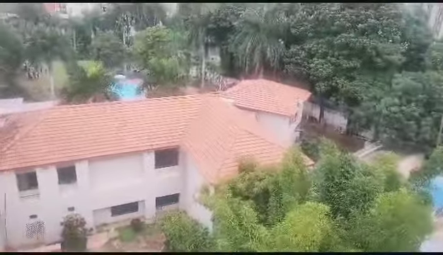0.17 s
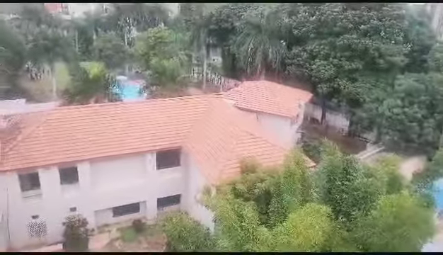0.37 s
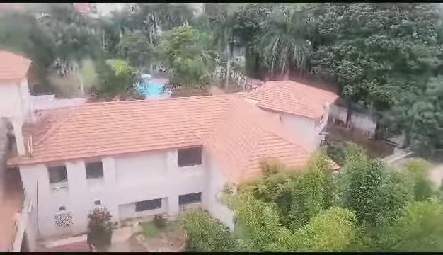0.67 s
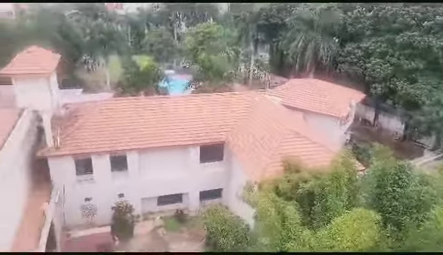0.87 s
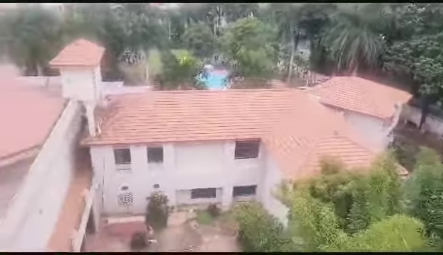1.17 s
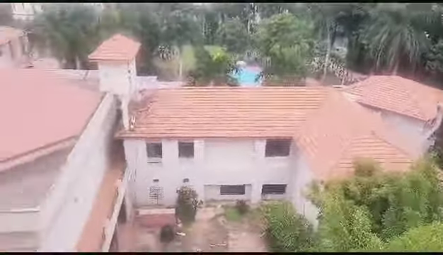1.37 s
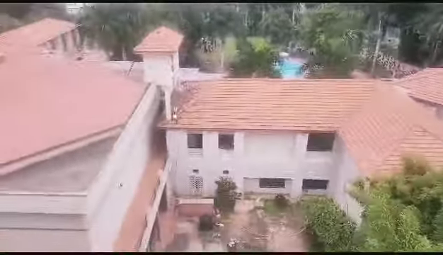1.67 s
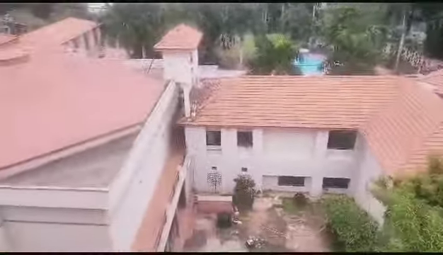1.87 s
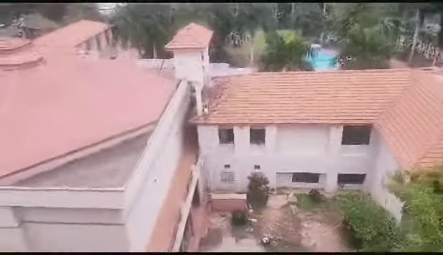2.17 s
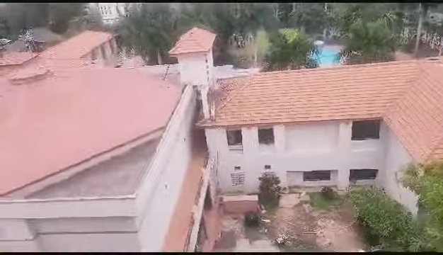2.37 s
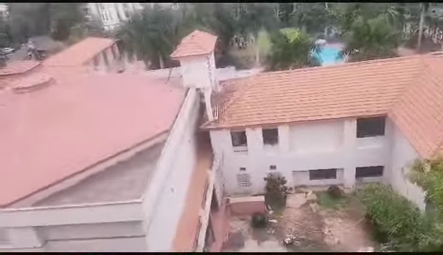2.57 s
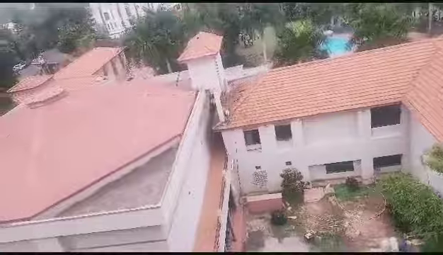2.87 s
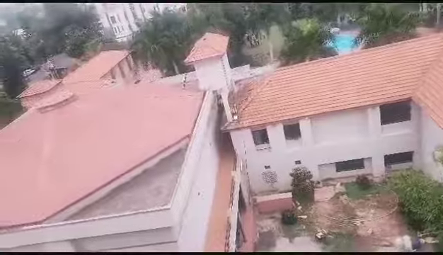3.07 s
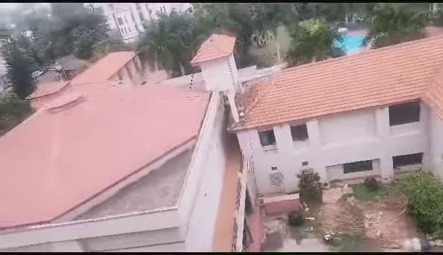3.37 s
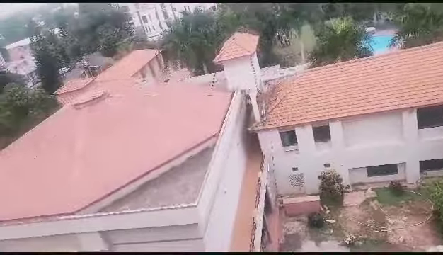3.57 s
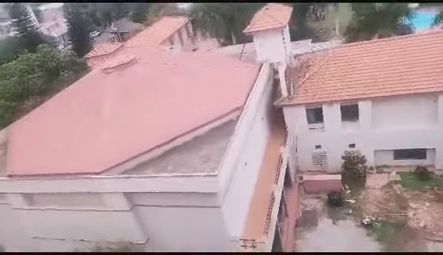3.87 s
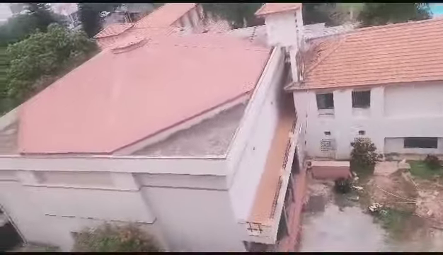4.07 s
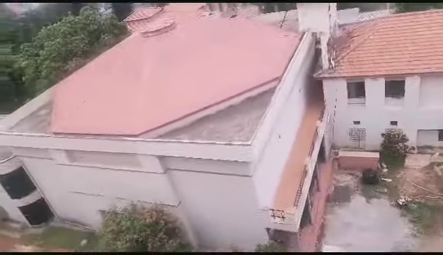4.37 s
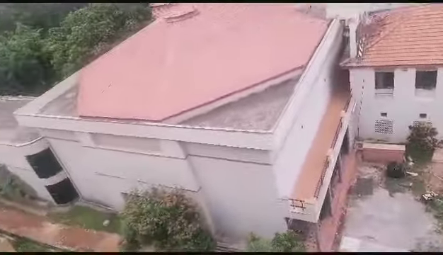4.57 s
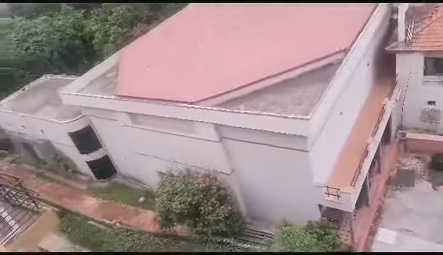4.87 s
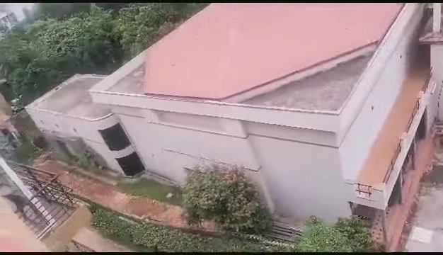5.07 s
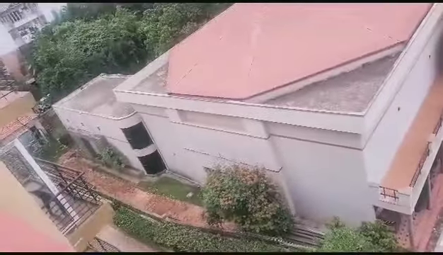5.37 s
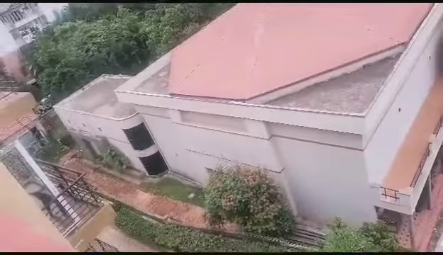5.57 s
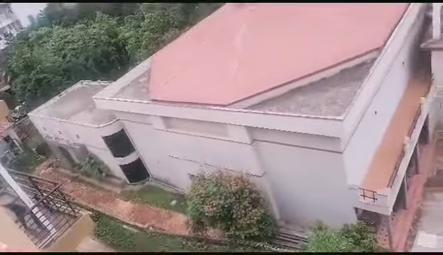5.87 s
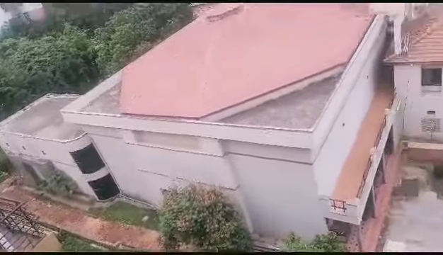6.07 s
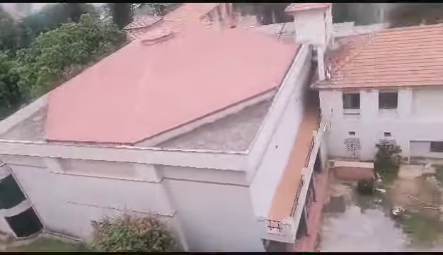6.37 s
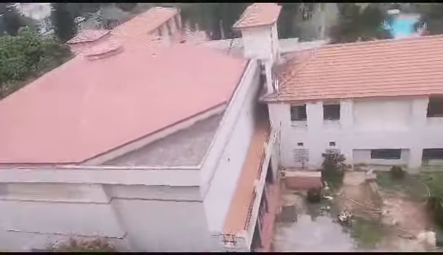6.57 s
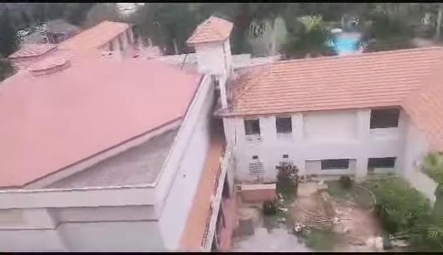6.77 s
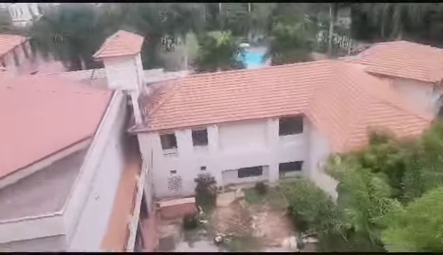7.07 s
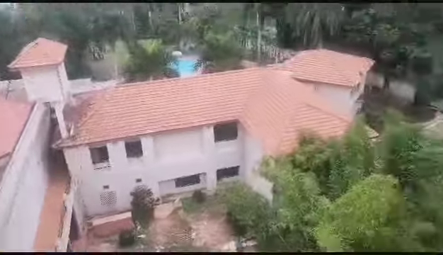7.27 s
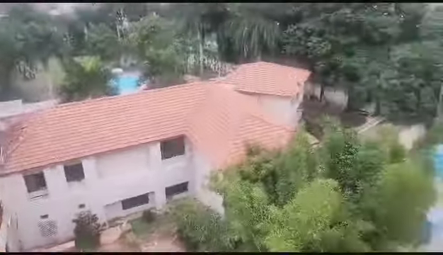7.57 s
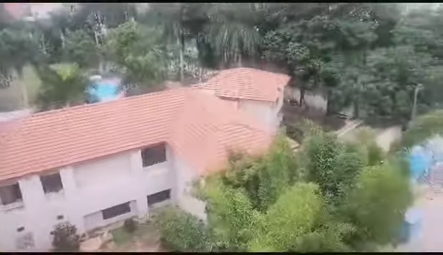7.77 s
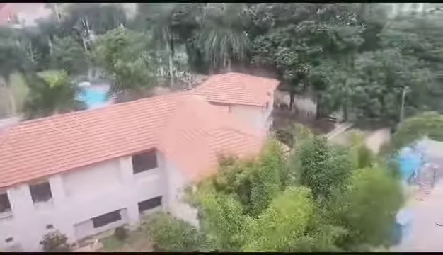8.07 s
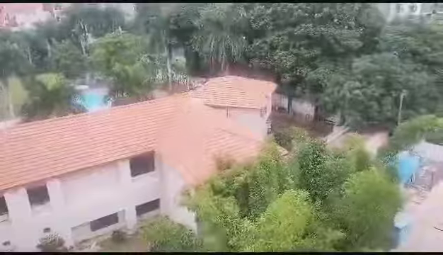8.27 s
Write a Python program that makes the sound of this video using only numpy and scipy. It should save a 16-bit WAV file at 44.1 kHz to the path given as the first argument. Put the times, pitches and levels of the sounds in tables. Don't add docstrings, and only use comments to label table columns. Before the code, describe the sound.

From high above tiled roofs, dull machine hammering at seven blows a second echoes between walls, then ceases as birds cry faintly and the engine fades.

```python
import sys
import numpy as np
from scipy import signal
from scipy.io import wavfile
from scipy.ndimage import uniform_filter1d

SR = 44100
rng = np.random.default_rng(int(sys.argv[2]) if len(sys.argv) > 2 else 0)


def int16_out(signal):
    q = np.round(np.clip(np.atleast_2d(signal).T, -1, 1) * 32767)
    wavfile.write(sys.argv[1], SR, q.astype(np.int16))


def undo_db(level):
    steps = np.asarray(level, float) / 20
    return 10 ** steps


N = 371322


def evened(x):
    return x / np.sqrt(np.mean(x ** 2) + 1e-20)


def read(points, hz):
    f, value = np.transpose(points)
    return np.interp(np.log(hz + 1), np.log(f + 1), value)


def curves(rows, t):
    s, *columns = np.transpose(rows)
    return [np.interp(t, s, c) for c in columns]


def swells(rows, t):
    return sum(db * np.exp(-((t - s) / half) ** 2) for s, half, db in rows)


def drift(per_s):
    count = int(N / SR * per_s) + 2
    knots = rng.standard_normal(count)
    return evened(np.interp(np.linspace(0, count - 1, N), np.arange(count), knots))


def add(mix, s, sound):
    at = round(s * SR)
    sound = sound[..., max(-at, 0):]
    part = mix[..., max(at, 0):][..., :sound.shape[-1]]
    part += sound[..., :part.shape[-1]]


# t/s, lag of left port/samples
PORT_LAG = [(0, -12), (.75, -10), (1.25, 1), (1.75, 6), (3.25, 8), (4.25, 13), (5.75, 16), (6.75, 12),
            (7.25, 1), (7.75, -10), (8.42, -8)]


def ports(x, pan_db):
    n = np.arange(N)
    lag, = curves(PORT_LAG, n / SR)
    left = np.interp(n - lag / 2, n, x) * undo_db(pan_db / 2)
    right = np.interp(n + lag / 2, n, x) * undo_db(-pan_db / 2)
    return np.array([left, right])


# t/s, blow number, strength/dB
STROKE = [(0.0171, 0, -24), (0.1763, 1, -21.5), (0.325, 2, -21), (0.7456, 5, -14.5), (1.327, 9, -15),
          (1.4786, 10, -15.5), (1.7801, 12, -15), (2.0736, 14, -14.5), (2.795, 19, -15.5),
          (3.0803, 21, -12.5), (3.5084, 24, -13.5), (4.2501, 29, -15.5), (4.7072, 32, -14.5),
          (4.8555, 33, -17.5), (5.4434, 37, -17.5), (6.0481, 41, -17), (6.202, 42, -17), (6.6818, 45, -18)]


def blows():
    s, number, db = np.transpose(STROKE)
    each = np.arange(round(number[-1]) + 1)
    return np.interp(each, number.round(), s), np.interp(each, number.round(), db)


def thud(t, hz):
    return np.exp(-(t * hz / 0.64) ** 2) * np.cos(2 * np.pi * hz * t + 1.14)


THUD_HZ, CASING_HZ, PLATE_HZ = 169, 284.5, 440
BRISK_GAP_S, SAG_PER_S = 0.1484, 14
ECHO_DB, ECHO_FOLLOW, SOFT_ECHO_DB_PER_S = -15.5, 0.1, -350
CASING_DB, CASING_DB_PER_LAG = -7, 0.3153
PLATE_DB, PLATE_DB_PER_LAG = -11.5, 0.47
# delay/s, signed share
THUD_PATHS = [(-0.0169, -0.21), (-0.0062, -0.23), (-0.0003, -1.0), (0.0119, -0.76), (0.0169, -0.41),
              (0.0276, -0.3), (0.0326, 0.39), (0.0464, 0.4), (0.0666, 0.27), (0.0729, -0.23),
              (0.0836, -0.31), (0.1035, -0.19)]


def breaker():
    out, t = np.zeros(N), np.arange(-600, 600) / SR
    times, strengths = blows()
    waver = rng.standard_normal((len(times), len(THUD_PATHS), 3))
    slows = np.maximum(np.gradient(times) - BRISK_GAP_S, 0)
    lags, = curves(PORT_LAG, times)
    for s, db, slow, lag, row in zip(times, strengths, slows, lags, waver):
        slab = thud(t, THUD_HZ * (1 - SAG_PER_S * slow))
        plate = undo_db(PLATE_DB + PLATE_DB_PER_LAG * lag) * thud(t - .004, PLATE_HZ)
        casing = thud(t - .002, CASING_HZ) + plate
        echo_db = (1 - ECHO_FOLLOW) * min(ECHO_DB - db, 3.5) + SOFT_ECHO_DB_PER_S * slow
        casing_db = CASING_DB + CASING_DB_PER_LAG * lag
        for (delay, share), (early, strong, sharp) in zip(THUD_PATHS, row):
            casing_share = abs(share) ** 0.35 * np.sign(share) * undo_db(casing_db - 13.5 + 2 * sharp)
            blow = share * slab + casing_share * casing
            path_db = 1.6 * strong + echo_db * (delay > 0)
            add(out, s + delay + t[0] + early / 8000, undo_db(db + 9.0 + path_db) * blow)
    return out


# f/Hz, t60/s
YARD_T60 = [(50, 1.1), (150, 1.66), (300, 0.69), (600, 0.58), (1500, 0.22)]
# f/Hz, density/dB per Hz
YARD_TONE = [(18, -51.5), (30, -19), (49, -9.5), (102, -10), (173, -13), (344, -8.5), (373, -37),
             (518, -20.5), (805, -19.5), (949, -42), (1500, -41), (1950, -74.5), (3300, -120)]


def yard():
    clicks = np.zeros(N)
    for s, db in zip(*blows()):
        clicks[round(s * SR)] = undo_db(db)
    hz, t, z = signal.stft(rng.standard_normal((2, 2 * SR)), SR, nperseg=1024)
    z[1] = 1.38 * z[0] + 0.15 * z[1]
    z = z * undo_db(read(YARD_TONE, hz)[:, None] - 60 * t / read(YARD_T60, hz)[:, None])
    tail = signal.istft(z, SR, nperseg=1024)[1]
    tail = tail * np.clip(np.arange(tail.shape[1]) / SR / .03 - 1, 0, 1)
    tail = tail / np.linalg.norm(tail[0])
    return undo_db(21) * signal.fftconvolve(clicks[None], tail, axes=1)[:, :N]


FIRING_HZ, FIRING_WANDER_HZ, FIRING_DB = 62.75, 7, -30.5
# t/s, level/dB
LOAD = [(0, 0), (.6, 2), (1.4, 1), (2.4, -0.1), (3.4, -0.6), (4.4, 0.3), (5.4, 0.5), (6.2, -2.2),
        (6.7, -3.5), (6.95, -1.5), (7.2, -4), (7.4, -4.5), (7.6, -5.5), (7.85, -6), (8.15, -10),
        (8.42, -13)]


def firing(t):
    hz = FIRING_HZ + FIRING_WANDER_HZ * drift(14.)
    tone = np.sin(2 * np.pi * np.cumsum(hz) / SR + np.array([[.4], [-.4]]))
    level_db = FIRING_DB + 1.0 + 0.82 * curves(LOAD, t)[0] + 1.7 * drift(8.3)
    return tone * undo_db(level_db + np.array([[-.6], [.6]]))


def ring(hz, width):
    b, a = signal.iirpeak(hz, hz / width, SR)
    wide_b, wide_a = signal.iirpeak(hz, hz / (4 * width), SR)
    narrow = signal.lfilter(b, a, rng.standard_normal((2, N)))
    return evened(signal.lfilter(wide_b, wide_a, narrow))


# f/Hz, width/Hz, level/dB
STEEL_MODES = [
    [(1712, 34, 0), (1513, 45, -9)],
    [(2767, 16, 0), (2886, 18, -6), (3030, 18, -7), (10621, 40, -22), (9130, 45, -21)],
    [(3930, 70, 0), (5599, 27, -5), (6432, 30, -8), (5276, 30, -8)],
    [(4430, 24, 0), (5981, 30, -10), (7499, 25, -14), (13754, 40, -28), (13980, 40, -28)],
]
STEEL_DB = [7, 10, 7, 13.5]
# part, t/s, half-width/s, level/dB
RATTLES = [(0, 0.56, .6, 3.5), (0, 3.0, 0.3, 8), (0, 4.66, .4, 3.5), (0, 6.7, 0.63, 5), (0, 7.18, 0.11, 14),
           (1, .3, 0.28, 4), (1, 6.6, 0.12, 4), (1, 7.47, .22, 16.5), (2, 2.4, 0.36, 10),
           (2, 3.25, 0.28, 15), (2, 4.07, 0.47, 15), (2, 5.2, .6, 7.5), (2, 7.36, 0.71, 13),
           (3, 0.42, .7, 14), (3, 6.82, 0.69, 8), (3, 7.45, .35, 8)]
REST_DB, STEEL_LOAD = [-60, -68.5, -75, -77.5], [0.65, 0.083, .25, .15]


def steel(t):
    out, (load,) = np.zeros((2, N)), curves(LOAD, t)
    for k, modes in enumerate(STEEL_MODES):
        loose = [row[1:] for row in RATTLES if round(row[0]) == k]
        shake_db = REST_DB[k] + STEEL_LOAD[k] * load + swells(loose, t)
        part = sum(ring(hz, width) * undo_db(db + 1.5 * drift(12.)) for hz, width, db in modes)
        out += part * undo_db(shake_db + STEEL_DB[k])
    return out * undo_db([[-1.5], [1.5]])


WHINE_S, WHINE_DB, WHINE_RISE_DB_PER_S, WHINE_FALL_DB_PER_S = 7.27, -47.5, 104, 27
# t/s, level/dB
DRONE = [(6.6, -59), (6.86, -50), (7.0, -46), (7.25, -43.5), (7.38, -43.5), (7.51, -35.5), (7.7, -46),
         (7.9, -47), (8.42, -52.5)]
# f/Hz, width/Hz
DRONE_MODES = [
    (680, 90),
    (5276, 30),
]


def drone(t):
    fade = np.clip((t - DRONE[0][0]) / 0.58, 0, 1)
    rise_db, fall_db = WHINE_RISE_DB_PER_S * (t - WHINE_S), WHINE_FALL_DB_PER_S * (WHINE_S - t)
    levels_db = curves(DRONE, t) + [WHINE_DB + np.minimum(rise_db, fall_db)]
    both = sum(ring(*mode) * undo_db(db + 3.5) for mode, db in zip(DRONE_MODES, levels_db))
    return fade * both * undo_db([[-1.5], [1.5]])


LOW_PAN_DB, HIGH_PAN_DB, GUST_PAN_DB = -1.2, -1.5, 0.15
# f/Hz, density/dB per Hz
BOOM = [(20, -55.5), (30, -19), (45, -9), (64, 7), (90, 7.5), (130, -5), (200, -69.5)]
RUMBLE = [(60, -40), (100, -10), (170, -2), (225, 0), (320, -20), (500, -60), (2000, -110)]
HUM = [(150, -40.5), (215, -3.5), (260, -1), (310, -4.5), (400, -17.5), (550, -47), (800, -82.5),
       (2000, -110)]
WASH = [(250, -44.5), (380, -5), (460, -3.5), (560, -6.5), (750, -8), (950, -23), (1500, -71),
        (6000, -90.5)]
SWISH = [(500, -39.5), (800, -4), (1200, -5), (1500, -10.5), (2200, -20.5), (2800, -26.5), (4000, -78.5)]
HISS = [(1060, -29.5), (1800, -5), (2290, -5.5), (2820, -4), (3250, -7.5), (4030, -10), (6530, -13.5),
        (8200, -22), (10700, -42), (18000, -120)]
AIR = [(4880, -31), (8300, -23), (8540, -6.5), (9230, 11.5), (11900, 7.5), (14100, -5.5), (15200, -12)]
FRAME = [(150, -91), (280, -23), (360, 0.5), (430, 8), (510, -3), (620, -41), (1200, -110)]
# level/dB, share of load, of bustle, of gusts, turn/dB per sample of lag
LAYERS = [
    (-30.5, .8, 0.14, .01, 0.04),
    (-29, 1.22, 0.0092, .01, 0.044),
    (-33, 0.23, .01, 0.013, 0.51),
    (-35, 1.2, 0.071, 0.47, -0.0231),
    (-41.5, 0.35, 0.59, 0.51, 0.21),
    (-46.5, .05, 0.69, 0.87, 0.04),
    (-65, .15, 0.74, 0.9, -0.02),
    (-47, 1.7, .01, .01, 0.71),
]
# t/s, level/dB
BUSTLE = [(0, 4.5), (.3, 6), (.7, 4), (1.05, 0.2), (1.45, -1.4), (2.2, -0.5), (3.05, .8), (3.9, -1.2),
          (5.05, -0.4), (5.85, -1.6), (6.3, -3.2), (6.8, -2.3), (7.0, 0), (7.7, 1.5), (7.95, -2),
          (8.15, -5), (8.3, -0.5), (8.42, -2.2)]
# t/s, half-width/s, level/dB
GUSTS = [
    (7.25, 0.0083, 11),
    (7.41, 0.042, 3.5),
    (7.53, 0.088, 9),
]
# f/Hz, left-right likeness
SAME = [(30, .45), (70, 0.71), (130, 1), (300, 0.87), (700, 0.83), (1500, 0.42), (3000, 0.04), (7000, 0.07),
        (14000, 0.27)]
# f/Hz, left-right/dB
LEAN = [(60, -2), (110, -4.5), (200, -1), (380, -2), (690, -3), (1280, -3), (2360, -6), (4350, -7),
        (8020, -8), (14800, 12.5)]
# f/Hz, depth/dB
PATCHY = [(100, -1), (1000, 1.48), (6000, 2), (9000, 4), (14000, -1.5)]


def site():
    frames, hz = N // 512 + 5, np.fft.rfftfreq(2048, 1 / SR)
    t = np.arange(frames) * 512 / SR
    colours = [undo_db(2 * read(c, hz)) for c in (BOOM, RUMBLE, HUM, WASH, SWISH, HISS, AIR, FRAME)]
    lag, gust_db = *curves(PORT_LAG, t), swells(GUSTS, t)
    drives = [np.ones(frames), *curves(LOAD, t), *curves(BUSTLE, t), gust_db, lag]
    levels_db = np.array(LAYERS) @ drives
    power = sum(np.outer(c / c.sum(), undo_db(2 * db)) for c, db in zip(colours, levels_db))

    a, b, c, d, patches = rng.standard_normal((frames, len(hz), 5)).T
    patches = evened(uniform_filter1d(uniform_filter1d(patches, 24, 0), 5, 1))
    same = np.clip(read(SAME, hz), 0, 1)[:, None]
    left = a + 1j * b
    shared = same * left * np.exp(2j * np.pi * hz[:, None] * lag / SR)
    right = shared + np.sqrt(1 - same ** 2) * (c + 1j * d)

    low_db, high_db = LOW_PAN_DB + GUST_PAN_DB * gust_db, HIGH_PAN_DB - GUST_PAN_DB * gust_db / 2
    high = np.clip(hz / 1500, 0, 1)[:, None]
    pan_db = read(LEAN, hz)[:, None] + (1 - high) * (low_db + 1.4) + high * (high_db + 4.5)
    z = np.array([left * undo_db(pan_db / 2), right * undo_db(-pan_db / 2)])
    z *= np.sqrt(power) * undo_db(read(PATCHY, hz)[:, None] * patches)
    return signal.istft(z, nperseg=2048, noverlap=1536)[1][:, :N] * undo_db(0.5)


# t/s, peak/dB, f/Hz, left-right/dB
KNOCKS = [(0.022, -18, 100, -2.5), (0.332, -21, 75, -1.9), (6.763, -19, 85, -12), (6.92, -18.5, 82.6, -13),
          (7.068, -25, 140, -6), (7.33, -21.5, 69, -14), (7.503, -24, 108, -13), (7.867, -29.5, 54, -8),
          (7.882, -33, 125, -7), (8.085, -37, 78.5, 1), (8.232, -35, 68.2, 1.0)]


def wind():
    out = np.zeros((2, N))
    for s, db, hz, pan_db in KNOCKS:
        cycles = np.arange(round(3 * SR / hz)) * hz / SR
        push = np.sin(2 * np.pi * cycles) * cycles * np.exp(1 - cycles / 0.42) / 0.28
        add(out, s + 0.0085, undo_db(db + 1.0 + pan_db * np.array([[.5], [-.5]])) * push)
    return out


def resonate(x, hz, width):
    turn = np.exp(2j * np.pi * np.cumsum(hz * np.ones(len(x))) / SR)
    r = np.exp(-np.pi * width / SR)
    return 2 * (turn * signal.lfilter([1 - r], [1, -r], x / turn, axis=0)).real


SWELL_DB_PER_KHZ, CRY_EDGE, EASE = 12, 0.11, 1.3
# t/s, length/s, start f/Hz, end f/Hz, peak/dB
CRIES = [
    (6.344, 0.19, 3360, 2795, -45.5),
    (6.592, .09, 2840, 2780, -49.5),
    (6.681, .18, 2840, 2943, -48.5),
    (6.873, .2, 3015, 2693, -48.5),
    (7.121, 0.089, 2730, 2580, -53.5),
    (8.016, .25, 3530, 2847, -45),
]


def cry(length, start_hz, end_hz, peak_db):
    count = len(np.arange(0, length, 1 / SR))
    hz = end_hz + (start_hz - end_hz) * np.linspace(1, 0, count) ** EASE
    db = peak_db - SWELL_DB_PER_KHZ * np.maximum(hz - end_hz, 0) / 1000
    shake, flutter = uniform_filter1d(rng.standard_normal((count, 2)), 250, 0).T
    voice = np.sin(2 * np.pi * np.cumsum(hz + 38 * evened(shake)) / SR) * undo_db(3 * evened(flutter))
    strand = resonate(resonate(rng.standard_normal(count), 0.915 * hz, 150.), hz, 250.)
    both = evened(voice) + undo_db(-6) * evened(strand)
    return undo_db(db) * both * signal.windows.tukey(count, CRY_EDGE)


# t/s, peak/dB, start f/Hz, end f/Hz, length/s
CHIRPS = [(4.574, -42, 3450, 2650, .018), (4.604, -42, 3300, 2600, .018), (4.622, -44, 3200, 2700, .011),
          (4.85, -44, 3200, 2700, .011), (4.884, -43, 3150, 2600, .013), (4.908, -42, 3600, 2700, .015),
          (4.552, -47, 2800, 2450, .012), (4.868, -47, 2850, 2500, .01), (4.645, -47, 2900, 2600, .01),
          (5.145, -45, 3300, 2900, .011), (5.158, -44, 2900, 2550, .012), (5.197, -43, 3200, 2600, .018),
          (6.972, -49, 5200, 4800, .018), (7.24, -49, 4000, 3600, .02)]
# delay/s, level/dB, left-right/dB
CALL_ECHOES = [(.03, -8, 3), (.065, -8, -4), (.1, -8, -4), (.14, -11, 2), (.21, -15, -1)]


def birds():
    out = np.zeros(N)
    for s, *call in CRIES:
        add(out, s, cry(*call))
    for s, db, start_hz, end_hz, length in CHIRPS:
        hz = np.geomspace(start_hz, end_hz, round(length * SR))
        tone = np.sin(2 * np.pi * np.cumsum(hz) / SR)
        add(out, s, undo_db(db - 2.0) * signal.windows.tukey(len(hz), .6) * tone)
    heard = out * undo_db([[-2], [2]])
    for delay, db, pan_db in CALL_ECHOES:
        add(heard, delay, undo_db(db) * ports(out, pan_db))
    return heard


def scene():
    t = np.arange(N) / SR
    machine = ports(breaker(), .5 * LOW_PAN_DB) + yard() + firing(t) + steel(t) + drone(t)
    return machine + site() + wind() + birds()


def roll_off(x):
    return signal.sosfilt(signal.butter(12, 15150, fs=SR, output="sos"), x)


def record(dry):
    ceiling = .95
    mix = ceiling * np.tanh(dry / ceiling)
    return roll_off(mix)


dry = scene()
out = record(dry)
int16_out(out)
```